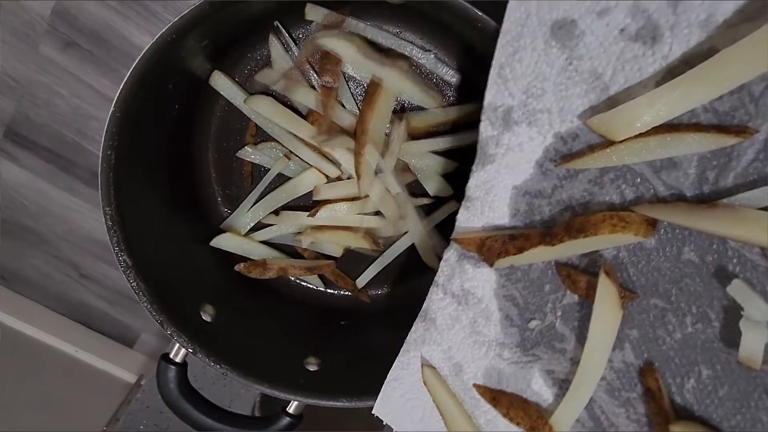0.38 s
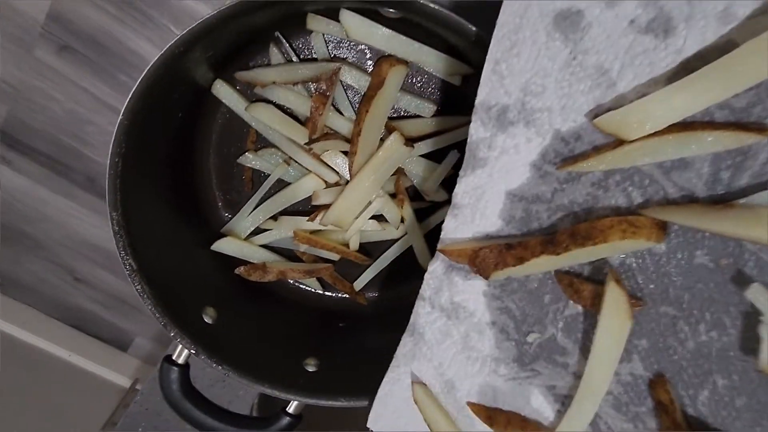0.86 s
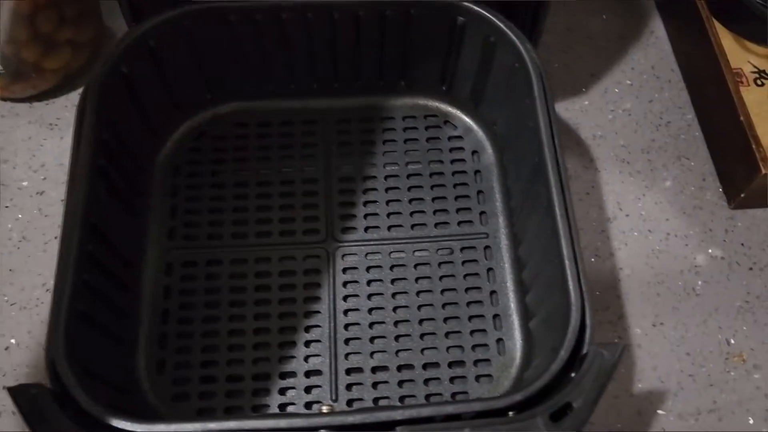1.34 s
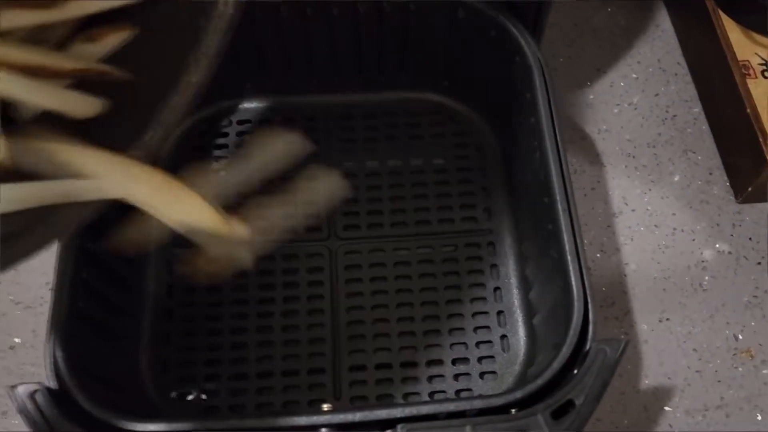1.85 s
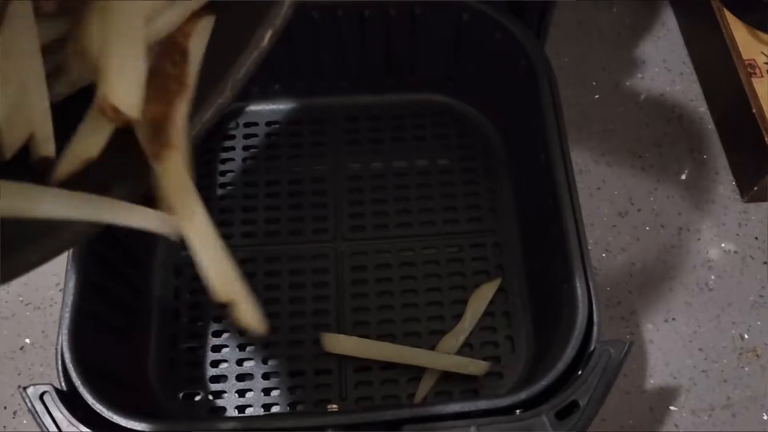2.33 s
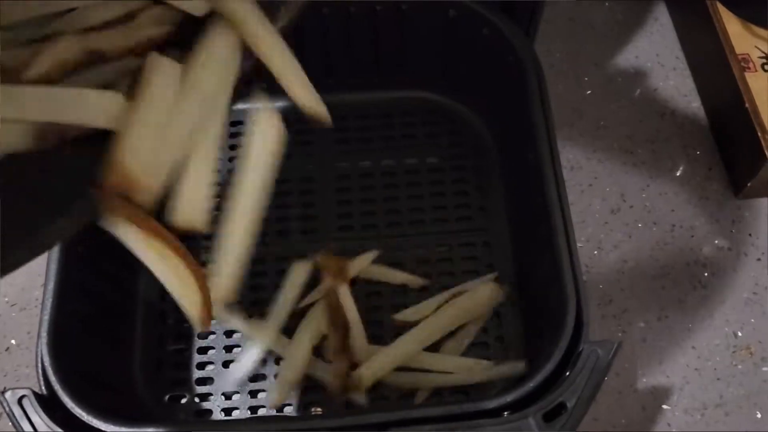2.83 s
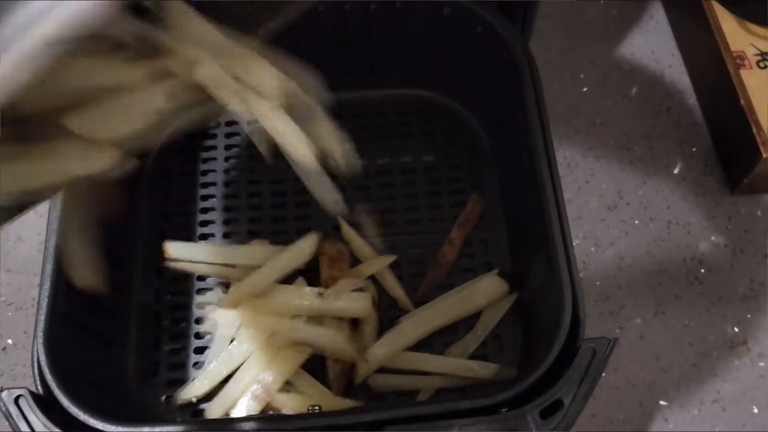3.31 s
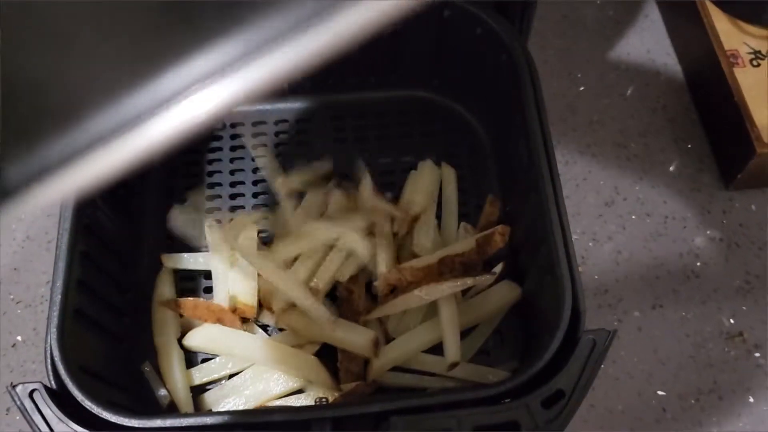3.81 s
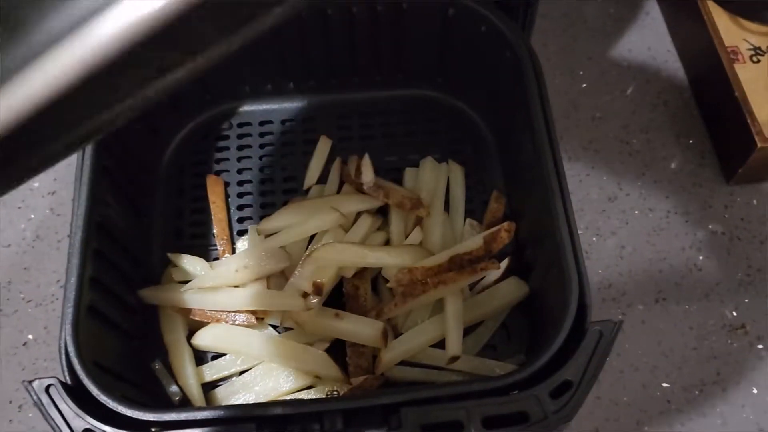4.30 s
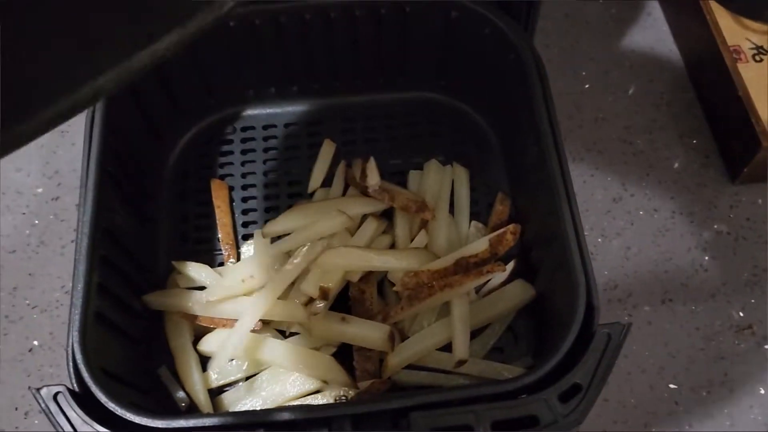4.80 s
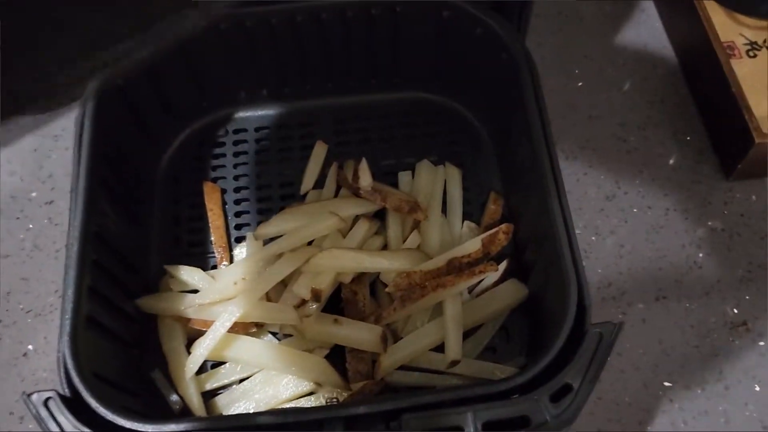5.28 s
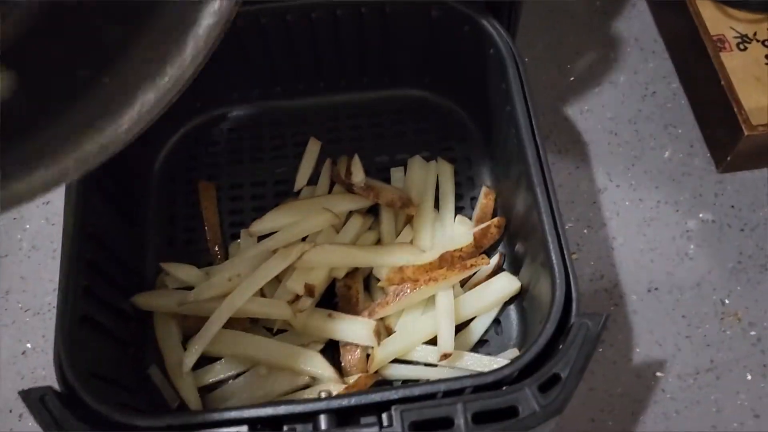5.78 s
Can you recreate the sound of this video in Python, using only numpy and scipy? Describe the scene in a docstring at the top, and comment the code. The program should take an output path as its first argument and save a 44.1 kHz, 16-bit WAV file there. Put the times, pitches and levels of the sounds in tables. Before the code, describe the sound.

A close stereo kitchen scene with a short, dark room echo. From 0 to about 0.65 s, raw potato sticks land in a filled pan: short dull thuds, densest in the first 0.4 s, with wet slaps and faint paper rubbing over a low appliance hum. Quiet hum remains until a tiny complete silence at 1.02-1.09 s. A different low hum follows, with soft scrapes and faint thin squeaks of sticks sliding. At 1.93 s the first sticks strike an empty metal basket with clear hollow rings; sparse ticks follow. Larger batches tumble from 2.46 to 3.0 s and 3.2 to 3.6 s, with wet slaps, soft knocks and low basket thumps, increasingly choked. Sharp last ticks fall near 3.8 s, a faint one at 4.17 s. A bright, finely crackling hiss starts around 1.93 s, swells during pouring and holds almost steady to the end, with a loud spit near 5.17 s.

```python
"""Raw potato sticks thud into a lined pan: damped modes, wet noise slaps and paper rubbing over a low appliance hum.
After a brief silence the hum changes, and sticks slide in the tilted pan with soft scrapes and thin squeaks.
They tip into a hot perforated basket: ringing modes under each landing, shortened as the pile grows.
Random soft knocks make the tumbling, low modes rock the basket on its feet, and a flaring hiss is the sizzle."""
import sys
import numpy as np
from scipy import signal
from scipy.io import wavfile
from scipy.ndimage import uniform_filter1d

SR = 44100
rng = np.random.default_rng(int(sys.argv[2]) if len(sys.argv) > 2 else 0)


def wav_out(sig):
    """Save sig, one row per channel (or a flat mono array), as 16-bit PCM at SR to the path in sys.argv[1]."""
    wavfile.write(sys.argv[1], SR, np.round(np.clip(np.atleast_2d(sig).T, -1, 1) * 32767).astype(np.int16))


def how_loud(loudness_db):
    """Turn decibels into a plain amplitude multiplier (0 dB gives 1, 20 dB gives 10)."""
    steps = np.asarray(loudness_db, float) / 20
    return 10 ** steps


N = 260190

# resonances of the metal basket before food damps them: pitch_hz, level_db, free_t60_s
BASKET_MODES = [(220, -17, .7), (340, -14, 0.33), (375, -1.5, 0.34), (446, -14, 0.3), (601, -1.5, .36),
                (650, -5, 0.33), (853, -11, 0.8), (918, -12, .8), (1013, -1, 0.55), (1099, -6, 0.45),
                (1176, -2, 0.25), (1275, -5, 0.2), (1335, -6, 0.25), (1410, -5, 0.2), (1460, -11, 0.25),
                (1683, -4, 0.4), (1766, -10, 0.31), (1850, -17, .4), (1975, -8, 0.4), (2013, -5, 0.5),
                (2137, -5, 0.2), (2210, -6, 0.3), (2320, -12, 0.35), (2430, -10, 0.3), (2620, -7, .3),
                (2900, -8, 0.3), (3200, -10, 0.3)]
FLOOR_TOP_HZ = 500  # modes below belong to the floor panel, the rest to the walls
CUT_START_S, CUT_END_S = 1.02, 1.086  # silence between the two places


def evened(x):
    """Scales a sound to rms 1."""
    return x / np.sqrt(np.mean(x ** 2) + 1e-20)


def read(points, hz):
    """Reads a curve of (Hz, value) points on a log-frequency axis."""
    point_hz, value = np.transpose(points)
    return np.interp(np.log(hz + 1), np.log(point_hz + 1), value)


def level(rows):
    """Gain over time from (s, dB) rows, silent outside them."""
    s, db = np.transpose(rows)
    return how_loud(np.interp(np.arange(N) / SR, s, db, -200, -200))


def add(mix, s, sound):
    """Mixes a stereo sound in at s seconds."""
    part = mix[:, round(s * SR):][:, :sound.shape[1]]
    part += sound[:, :part.shape[1]]


def noise(colour, same, patchy_db, flicker_db, size, lean=((1, 0), (2, 0))):
    """Stereo noise from random short-time spectra, with local patches and a flicker shared by all bins."""
    frames, hz = 4 * N // size + 5, np.fft.rfftfreq(size, 1 / SR)
    a, b, c, d, patches = rng.standard_normal((frames, len(hz), 5)).T
    patches = uniform_filter1d(patches, size=8, axis=0)
    patches = evened(uniform_filter1d(patches, size=8, axis=1))
    flicker = evened(uniform_filter1d(rng.standard_normal(frames), size=3))
    # left-right likeness: the right side shares part of the left and adds its own noise
    same = np.clip(read(same, hz), -1, 1)[:, None]
    left, own = a + 1j * b, c + 1j * d
    z = np.array([left, same * left + np.sqrt(1 - same ** 2) * own])
    z *= how_loud(read(colour, hz)[:, None] + patchy_db * patches + flicker_db * flicker)
    z *= how_loud(np.outer([.5, -.5], read(lean, hz)))[:, :, None]  # lean: dB louder on the left
    return evened(signal.istft(z, nperseg=size, noverlap=size * 3 // 4)[1][:, :N])


def ring(modes, blow_db, share, rise_s, right_lag_s, scatter_db, apart_hz, detune):
    """Damped modes scattered by the spot struck and the load; high ones reach the two microphones out of step."""
    hz, db, t60 = np.transpose(modes)
    t = np.arange(SR // 2) / SR
    spot, start, skew, load = rng.standard_normal((len(hz), 4)).T
    loose = np.minimum((hz / apart_hz) ** 2, 1)  # phase scatter, full above apart_hz
    late = 2 * np.pi * hz * right_lag_s + skew * loose
    phase = 2 * np.pi * (hz * (1 + detune * load))[:, None] * t + (start * loose)[:, None]
    start_db = db + blow_db + scatter_db * spot
    fade = how_loud(start_db[:, None] - 60 * t / (share * t60[:, None]))
    fade *= (1 - np.exp(-t / rise_s)) ** 2  # soft flesh presses before it lets go
    sine, cosine = fade * np.sin(phase), fade * np.cos(phase)
    right = np.cos(late) @ sine - np.sin(late) @ cosine
    return np.array([sine.sum(0), right])


def slap(db, low_hz, high_hz, rise_s, t60, tail_db, tail_t60):
    """Burst of band-passed contact noise with a longer spray dying after it."""
    t = np.arange(SR // 4) / SR
    band = signal.butter(2, [low_hz, high_hz], "bandpass", fs=SR, output="sos")
    burst = evened(signal.sosfilt(band, rng.standard_normal((2, len(t)))))
    fade = how_loud(-60 * t / t60) + how_loud(tail_db - 60 * t / tail_t60)
    return burst * how_loud(db) * fade * (1 - np.exp(-t / rise_s))


def kitchen():
    """Low appliance hum as coloured noise, different at the two places, with thin tones near the pan."""
    # hum spectrum at each place: pitch_hz, relative_level_db
    pan_hum = [(12, -48), (20, -8.5), (118, -20), (318, -4.5), (440, -33.5), (596, -27.5), (744, -33.5),
               (807, -43), (857, -37.5), (2500, -48.5), (3250, -92), (5500, -120)]
    basket_hum = [(12, -58), (20, -17), (48, -8), (102, 0.5), (188, -13.5), (233, -0.5), (347, -7.5),
                  (416, -17.5), (498, -22.5), (872, -32), (1030, -23.5), (1400, -46), (1500, -34),
                  (1950, -29), (3300, -120)]
    # left-right likeness of the hum: pitch_hz, likeness (1 = same)
    hum_same = [(60, .94), (180, .9), (550, .5), (1500, 0)]
    # thin steady tones: pitch_hz, rms_level_db
    whines = [(797, -84.5), (9950, -101)]
    t = np.arange(N) / SR
    whine = sum(np.sqrt(2) * how_loud(db) * np.sin(2 * np.pi * hz * t) for hz, db in whines)
    near_pan = how_loud(-58.5) * noise(pan_hum, hum_same, 2.5, 0.84, size=2048) + whine
    near_basket = how_loud(-59.5) * noise(basket_hum, hum_same, 1.8, 0.72, size=2048)
    return np.where(t < CUT_END_S, near_pan, near_basket)


def walls(x):
    """Short diffuse kitchen echo, darker as it dies, its bass alike at both microphones."""
    t = np.arange(SR // 3) / SR
    spray = rng.standard_normal((2, len(t))) * (t > .004)
    dark = signal.lfilter([1], [1, -.7], spray)
    tail = how_loud(-60 * t / 0.33) * dark + how_loud(-60 * t / 0.061) * spray
    bass = signal.butter(2, 500, fs=SR, output="sos")
    tail[1] += signal.sosfiltfilt(bass, tail[0] - tail[1])
    return signal.oaconvolve(x.mean(0)[None], tail / np.linalg.norm(tail[0]), axes=1)[:, :N]


def squeak(length_s, db, from_hz, to_hz, judder_hz):
    """A thin stick-slip tone that may glide; strong judder turns it into a rough scrape."""
    t = np.arange(0, length_s, 1 / SR)
    judder = evened(uniform_filter1d(rng.standard_normal(len(t)), size=150))
    hz = from_hz + (to_hz - from_hz) * t / length_s + judder_hz * judder
    swell = np.sqrt(np.sin(np.pi * t / length_s))
    tone = how_loud(db) * swell * np.sin(2 * np.pi * np.cumsum(hz) / SR)
    return np.array([tone, tone])


def rustle():
    """Faint rubbing of paper and sliding sticks as noise, with soft narrow-band scrapes and squeaks."""
    # rubbing, one list for each place: time_s, level_db
    rubbing = [
        [(0, -68.5), (.3, -70.5), (.42, -84.5), (1.02, -89.5)],
        [(1.085, -73.5), (1.45, -74.5), (1.75, -81.5), (1.95, -77)],
    ]
    # spectrum of the rubbing: pitch_hz, relative_level_db
    rubbing_colour = [(410, -54), (700, 2), (834, -35), (1300, -12), (2000, -8), (3500, -21), (4800, -18.5),
                      (8270, -15), (14000, -36)]
    # sticks scraping in the tilted pan: start_s, reference_level_db, pitch_hz
    scrapes = [(1.145, -61.5, 2850), (1.18, -68, 2280), (1.262, -59.5, 1020), (1.3844, -57.5, 1810),
               (1.514, -63.5, 1500), (1.6248, -61.5, 2780), (1.699, -70, 1850), (1.8716, -62, 2140)]
    # wet skin slipping on steel: start_s, length_s, level_db, from_hz, to_hz, judder_hz
    squeaks = [(1.25, 0.079, -83, 3070, 3070, 25), (1.51, .045, -82, 3070, 3070, 25),
               (1.772, .06, -76, 1860, 2750, 350)]
    out = noise(rubbing_colour, [(500, 0.32), (2000, 0.046)], 2.7, 1.6, size=256)
    out = out * sum(level(rows) for rows in rubbing)
    for s, db, hz in scrapes:
        add(out, s, slap(db - 2.0, 4100, 8700, 0.0031, 0.029, -7.0, 0.19))
        add(out, s, slap(db - 5.0, 1270, 2450, 0.004, 0.035, -6, 0.17))
        add(out, s, slap(db - 2.0, 0.95 * hz, 1.06 * hz, 0.0074, 0.059, -11, 0.11))
    for s, *row in squeaks:
        add(out, s, squeak(*row))
    return out


def sizzle():
    """Dense boiling hiss that excites resonances, flared by random spits and topped by loud single ones."""
    # hiss on the hot metal before resonances and flares: time_s, level_db
    hiss_level = [(1.93, -58), (2.15, -60.5), (2.6, -52.5), (3.3, -44.5), (3.6, -47), (3.85, -42.5),
                  (5.1, -40.5), (5.9, -42.5)]
    # hiss spectrum: pitch_hz, relative_level_db
    hiss_colour = [(300, -54), (560, -5), (720, -18), (1190, -1.5), (1800, -0.5), (2250, -1.5),
                   (2800, -1.5), (4300, -1), (5600, -1.5), (7000, 0.5), (8500, 1.5), (10200, -3),
                   (11600, 0), (15000, 0.66)]
    # left over right balance of the hiss: pitch_hz, lean_db
    hiss_lean = [(500, 2.5), (1200, -5), (2400, -7), (4400, 2.5), (8500, -2), (15000, -3)]
    # resonances that the hiss excites: pitch_hz, width_hz, added_level_db
    singing = [(604, 25, 5), (2150, 39, 0.5), (2338, 56, 2.5), (5510, 136, -3.5)]
    # single loud spits of water: start_s, level_db
    loud_spits = [(2.158, -40), (2.6265, -32), (2.7196, -40), (3.0316, -39), (3.369, -28), (3.443, -29),
                  (3.456, -28), (4.579, -40), (5.167, -27.5)]
    hiss = noise(hiss_colour, [(400, 1.0), (1200, 0.0053)], 1.0, 0.082, size=256, lean=hiss_lean)
    hiss = hiss + sum(how_loud(db) * signal.lfilter(*signal.iirpeak(hz, hz / width, SR), hiss)
                      for hz, width, db in singing)
    spits = (rng.random((2, N)) < 150 / SR) * rng.standard_normal((2, N))  # about 150 a second on each side
    spits = spits * how_loud(6.2 * np.minimum(rng.exponential(1, (2, N)), 3))
    t = np.arange(SR // 100) / SR
    fade = how_loud(-60 * t / 0.0092)[None]
    flare = evened(signal.oaconvolve(abs(spits + .6 * spits[::-1]), fade, axes=1)[:, :N])
    out = hiss * (1 + how_loud(-13.0) * flare) * level(hiss_level)  # each spit flares the hiss for a few ms
    for s, db in loud_spits:
        add(out, s, slap(db, 4500, 16000, .0002, .005, -15, .05))
    return out


def batches():
    """Strength of the tumbling over time: each batch swells, holds and settles."""
    # batches tumbling on the pile: full_strength_s, level_db, hold_s
    batch_rows = [(1.954, -38.5, 0.0062), (2.485, -45.5, 0.48), (3.173, -48, 0.013), (3.448, -49, 0.15)]
    rise_db_per_s, settle_db_per_s = 620, 101
    t = np.arange(N) / SR
    strength = np.zeros(N)
    for s, db, hold_s in batch_rows:
        before, after = np.maximum(s - t, 0), np.maximum(t - s - hold_s, 0)
        strength += how_loud(db - rise_db_per_s * before - settle_db_per_s * after)
    return strength


def tumble():
    """Many soft random knocks feed the basket modes, the low ones most; the basket thumps on its feet."""
    # thumps of the feet: start_s, bounce_db, sway_db
    thumps = [(1.988, -47, -40.5), (2.48, -58, -40), (2.642, -41.5, -46), (2.732, -52, -53),
              (2.85, -56, -41), (2.951, -47, -54), (3.019, -44.5, -70), (3.184, -49, -44.5),
              (3.277, -52, -44), (3.457, -44, -42.5), (3.502, -41.5, -42), (3.596, -45.5, -54),
              (3.682, -51, -64)]
    # whole basket, two bounces then a sway: pitch_hz, level_db, t60_s
    feet_modes = [(63.5, 4.5, 0.22), (96.35, -8.5, 1), (123.65, 1.5, 0.81)]
    knocks = (rng.random(N) < 300 / SR) * rng.standard_normal(N)  # about 300 a second
    knocks = knocks * how_loud(1.86 * np.minimum(rng.exponential(1, N), 4))
    t, (hz, db, t60) = np.arange(SR // 2) / SR, np.transpose(BASKET_MODES)
    is_floor = hz < FLOOR_TOP_HZ
    soft_db = db - 20 * np.log10(1 + (hz / 2800) ** 2)  # soft contact starves the treble
    start = 2 * np.pi * rng.random((2, len(hz), 1))
    start[1, is_floor] = start[0, is_floor]  # only wall modes differ left and right
    loaded_t60 = .5 * np.where(is_floor, t60, 0.27 * t60)
    fade = how_loud(soft_db[:, None] - 60 * t / loaded_t60[:, None])
    body = (fade * np.sin(2 * np.pi * hz[:, None] * t + start)).sum(1)
    body *= 1 - np.exp(-t / 0.0001)
    pushes = evened(knocks) * batches()
    out = signal.oaconvolve(pushes[None], body / np.linalg.norm(body[0]), axes=1)[:, :N]
    for s, bounce_db, sway_db in thumps:
        push_db = np.array([bounce_db, bounce_db, sway_db])
        add(out, s, ring(feet_modes, push_db, 1, .007, .0001, 1, 400, .004))
    return out


def pan():
    """Dull thuds: the food already in the pan damps the steel; heavy pieces push the low modes."""
    # landings: start_s, blow_db, heaviness_db (on the low modes), wet_slap_db
    pan_hits = [(.0045, -14, -12, -58), (.045, -37, 10, -66), (0.097, -26.5, 10, -64), (0.114, -26, 7, -57),
                (.125, -14.5, -10, -73), (.192, -12.5, -26, -60.5), (.215, -17, -13, -82),
                (0.2582, -18.5, -17, -57), (0.305, -39, 4, -81), (0.363, -24.5, -5, -62),
                (0.422, -42, -10, -87), (0.516, -39.5, 6, -72.5), (.645, -37.5, -18, -97)]
    # pan resonances before the food shortens them: pitch_hz, level_db, free_t60_s
    pan_modes = [(128, 2, 0.031), (206, -6.5, 0.034), (462, 9, 0.02), (590, -11.5, 0.029),
                 (1000, -26, 0.068), (1500, -17.5, 0.02), (2495, -33.5, 0.056)]
    out, low = np.zeros((2, N)), np.transpose(pan_modes)[0] < 300
    for s, blow_db, heavy_db, slap_db in pan_hits:
        thud = ring(pan_modes, blow_db + heavy_db * low, 0.61, 0.0031, -0.00014, 0.7, 1300, 0.055)
        add(out, s, thud * how_loud([[.6], [-.6]]))  # a little louder on the left
        # wet slap, and just after it sticks knocking each other
        add(out, s + 0.00095, slap(slap_db, 2300, 12000, 0.0011, 0.022, -9.0, 0.19))
        add(out, s + 0.0026, slap(blow_db - 39, 440, 1950, 0.0013, 0.027, -12.0, 0.24))
    return out


def choked(modes, s):
    """Adds to the modes the loss of the pile lying against them at s seconds."""
    choke_per_s, loaded_s = 6.2, 1.92  # loss (1 / t60) gained per second of pouring after loaded_s
    hz, db, t60 = np.transpose(modes)
    loss = choke_per_s * max(s - loaded_s, 0) * np.minimum(hz / 1000, 1) ** 2  # full above 1 kHz
    return np.transpose([hz, db, 1 / (1 / t60 + loss)])


def basket():
    """Each landing pushes the floor panel slowly and raps the walls sharply; the pile shortens the ring."""
    # ringing landings, shortened as the pile grows:
    # start_s, wall_blow_db, floor_blow_db, wet_slap_db, favoured_pitch_hz
    metal_hits = [(1.924, -61, -53, -60, 1270), (1.945, -30, -31, -37, 2420), (1.99, -30, -27.5, -41, 1110),
                  (2.028, -36, -53, -51, 1020), (2.098, -52, -34.5, -51.5, 1000),
                  (2.46, -48, -35, -55, 1950), (2.49, -29.5, -20, -47, 1420),
                  (2.550, -40, -61, -49.5, 2190), (2.635, -45, -27.5, -64, 1160),
                  (2.658, -45.5, -54, -45, 2290), (2.728, -42, -31, -53, 2200),
                  (2.872, -38.5, -37, -45.5, 2050), (2.934, -41, -37, -46, 2150),
                  (2.987, -47, -59, -49, 1220), (3.190, -45.5, -35, -56, 710),
                  (3.361, -52, -37.5, -52, 600), (3.411, -27.5, -41, -44, 1440),
                  (3.431, -34.5, -33, -40.5, 630), (3.452, -40, -42, -46, 1090),
                  (3.547, -46.5, -64, -44.5, 1820), (3.587, -45, -42, -58, 780)]
    # dry ticks choked at once by sticks on the metal: start_s, wall_blow_db, wet_slap_db, favoured_pitch_hz
    dry_ticks = [(2.259, -53, -50, 2217), (2.363, -55, -47.5, 2000), (2.398, -60, -54, 2060),
                 (2.769, -48, -48.5, 1270), (2.836, -58, -72, 2140), (3.031, -51, -48, 2220),
                 (3.215, -38, -41, 1820), (3.774, -44, -38, 2270), (3.792, -28.5, -34, 1890),
                 (4.174, -43.5, -50, 1500)]
    empty_share, empty_s, pile_s = 0.84, 1.37, 1.96  # ring share at empty_s, falling to 1/e in pile_s
    tick_share, tick_floor_db = 0.046, 0.5  # floor push relative to the wall blow
    stick_mode_db, stick_t60_s = -2.5, 0.087  # the stick's own woody note, before the load scales its decay
    hz = np.transpose(BASKET_MODES)[0]
    is_floor, below, above = hz < FLOOR_TOP_HZ, np.zeros((2, N)), np.zeros((2, N))
    panel, wall = np.array(BASKET_MODES)[is_floor], np.array(BASKET_MODES)[~is_floor]
    landings = [(*row, empty_share * np.exp((empty_s - row[0]) / pile_s)) for row in metal_hits]
    ticks = [(s, db, db + tick_floor_db, slap_db, spot_hz, tick_share)
             for s, db, slap_db, spot_hz in dry_ticks]
    for s, wall_db, floor_db, slap_db, spot_hz, share in landings + ticks:
        add(below, s, ring(panel, floor_db, share ** 0.75, .0035, .0001, 1.6, 1900, 0.005))
        # wall modes near the favoured pitch take most of the blow
        near_db = -8.5 * np.log2(hz[~is_floor] / spot_hz) ** 2
        rap = ring(choked(wall, s), wall_db + near_db, share ** .5, 0.0036 * share, 0.00021, 4.7, 1060, 0.0031)
        add(above, s, rap)
        # contact noise around the favoured pitch
        clatter = slap(wall_db - 10, 0.5 * spot_hz, 1.77 * spot_hz, 0.0023 * share,
                       0.18 * share, 1.0, 0.69 * share)
        add(above, s, clatter)
        stick = [(spot_hz, stick_mode_db, stick_t60_s)]
        add(above, s, ring(stick, wall_db, 1.35 * share ** .5, 0.00034, 0.00011, 2.4, 2400, 0.02))
        add(above, s, slap(slap_db, 3400, 16000, 0.0005, 0.023, -2.5, 0.13))  # wet slap
    return below + above * how_loud([[-1.8], [1.8]])  # the walls sound nearer the right microphone


def scene():
    """Mixes all sources, with the kitchen echo on the thuds and knocks."""
    thuds, knocks = pan(), basket() + tumble()
    echo = walls(how_loud(-10) * thuds + how_loud(-8) * knocks)
    return thuds + knocks + echo + sizzle() + rustle() + kitchen()


def band_limit(x):
    """A steep low-pass at the top of the band."""
    return signal.sosfilt(signal.butter(12, 16970, fs=SR, output="sos"), x)


def record(dry):
    """The microphone drops the deepest bass, the band ends sharply and the cut is silent."""
    t = np.arange(N) / SR
    bass_cut = signal.butter(2, 35, "highpass", fs=SR, output="sos")
    thinned = signal.sosfilt(bass_cut, dry)
    edge = signal.firwin(1023, 15660, window=("kaiser", 8), fs=SR)  # low-pass edge in Hz
    banded = signal.oaconvolve(thinned, edge[None], "same", axes=1)
    opened = np.clip(np.maximum(CUT_START_S - t, t - CUT_END_S) / 0.0001, 0, 1)  # 0.1 ms fades
    finished = banded * opened
    return band_limit(finished)


dry = scene()
out = record(dry)
wav_out(out)
```